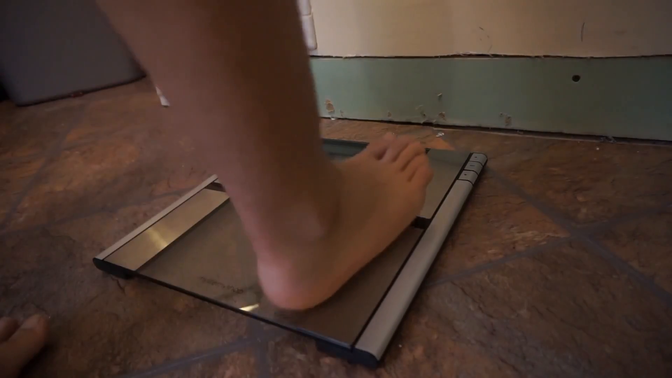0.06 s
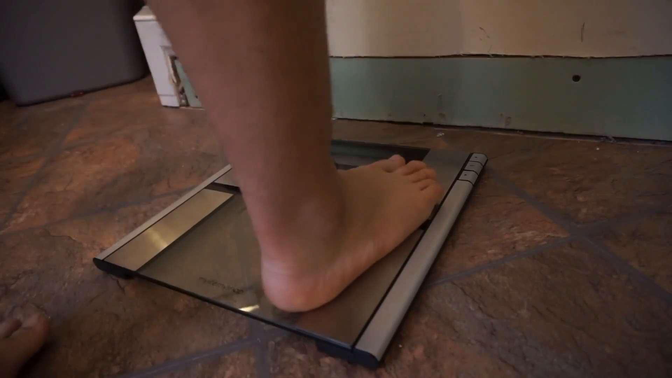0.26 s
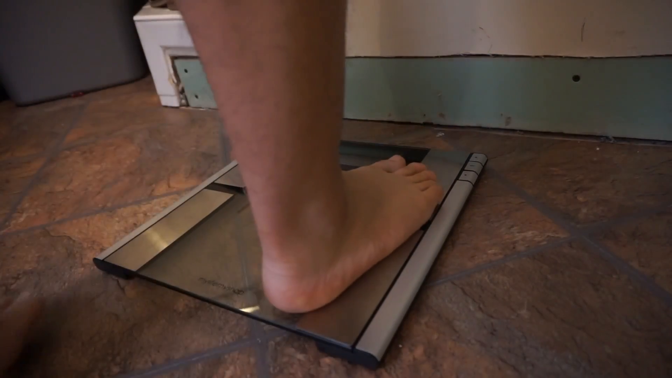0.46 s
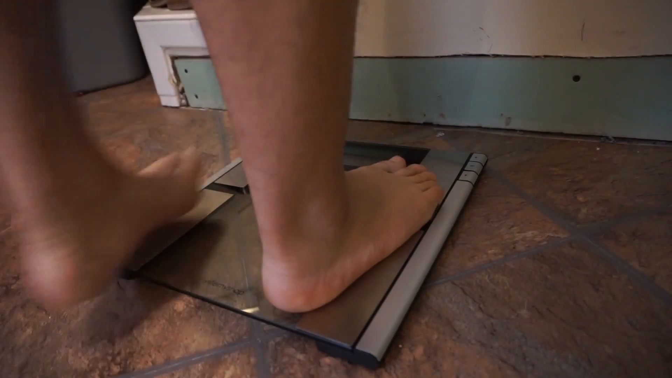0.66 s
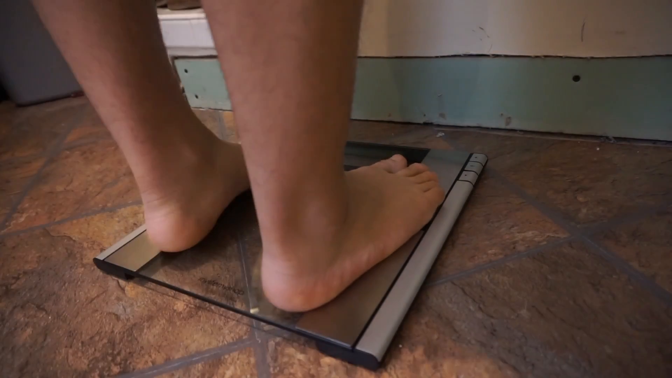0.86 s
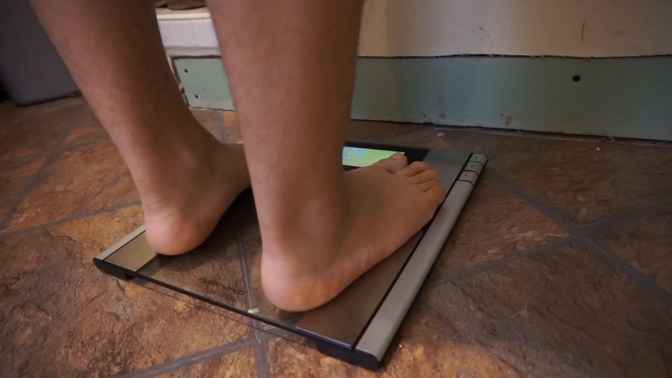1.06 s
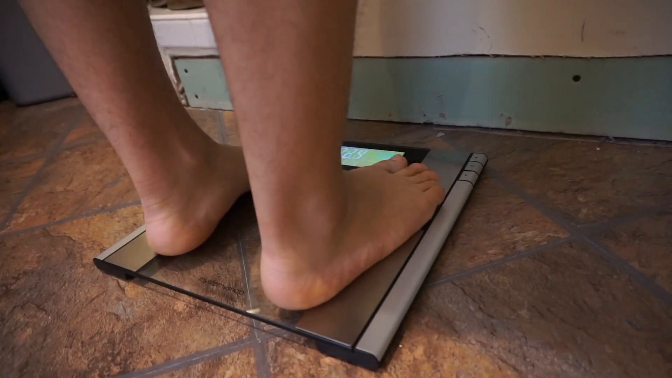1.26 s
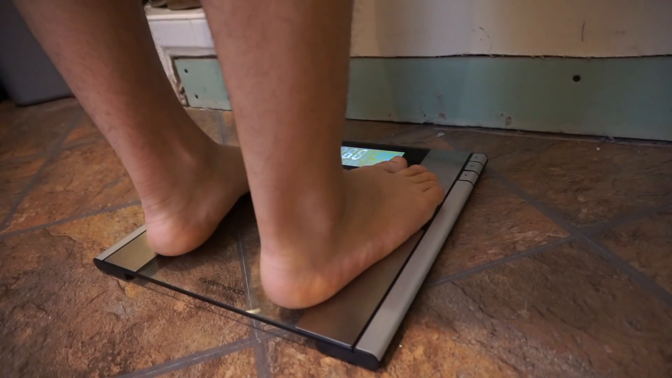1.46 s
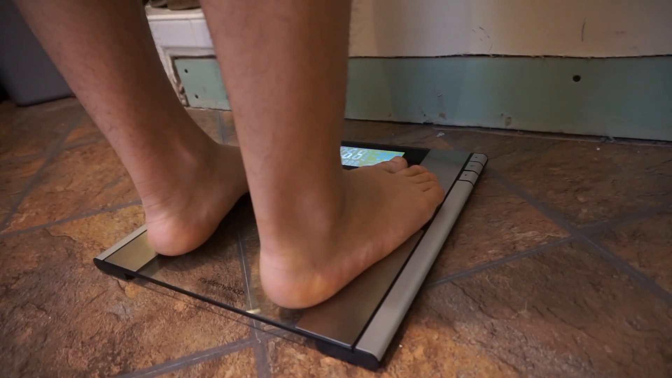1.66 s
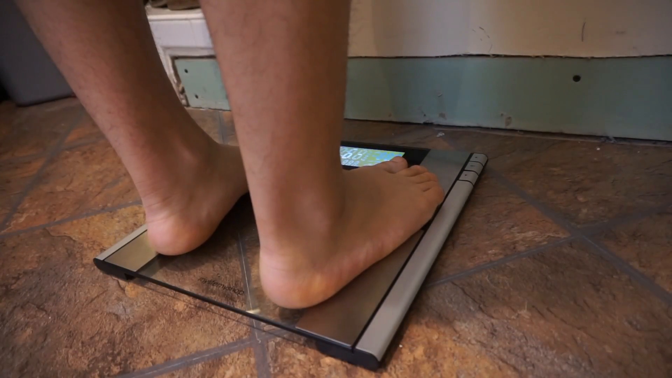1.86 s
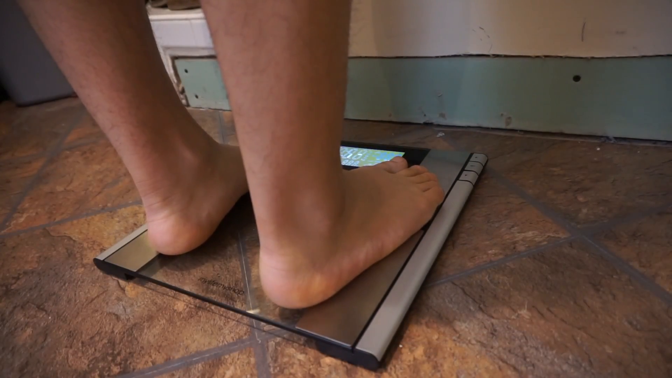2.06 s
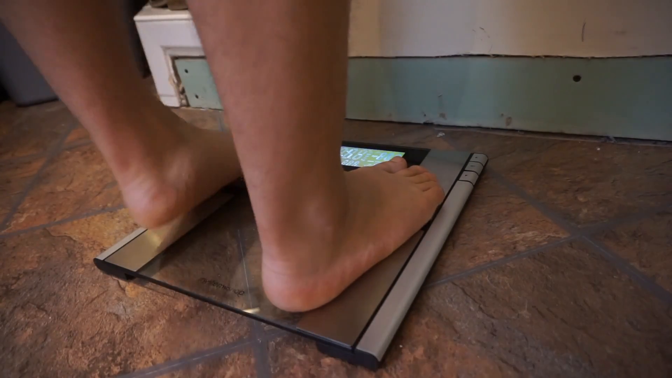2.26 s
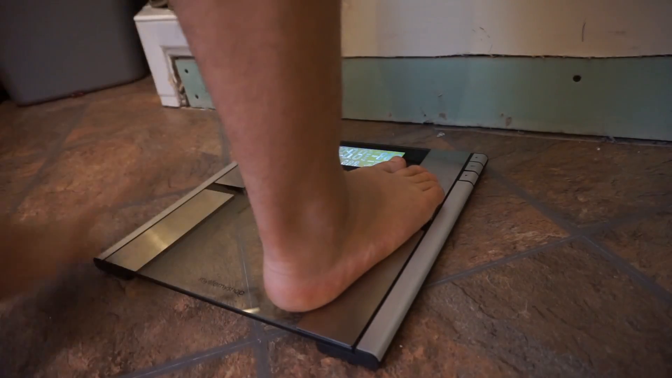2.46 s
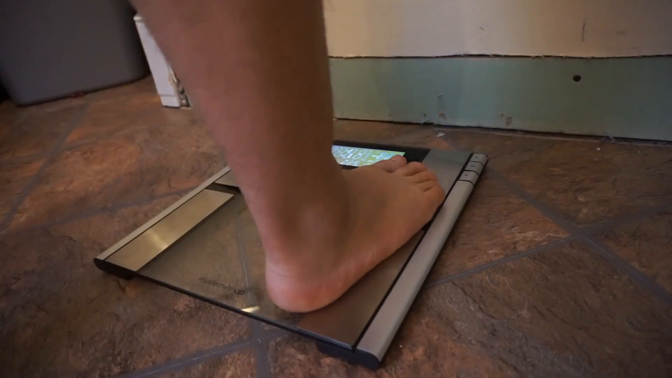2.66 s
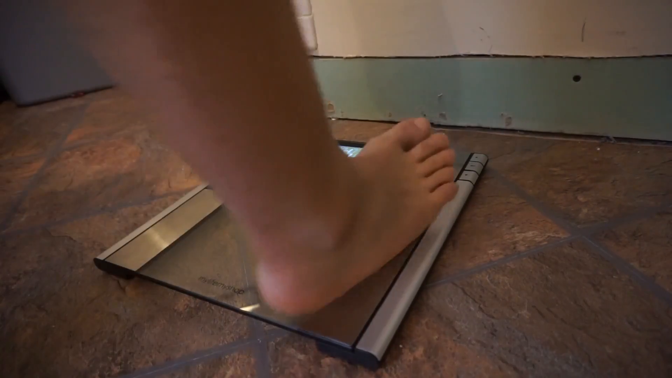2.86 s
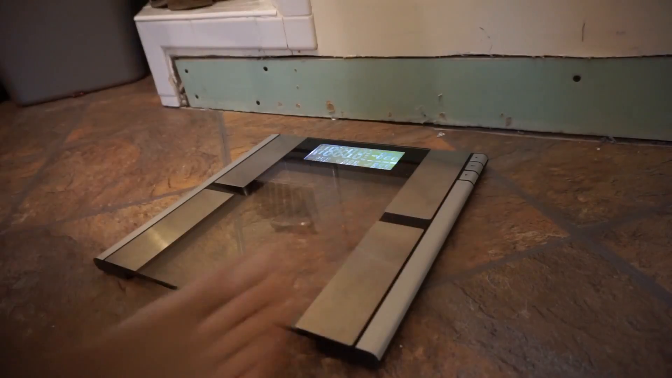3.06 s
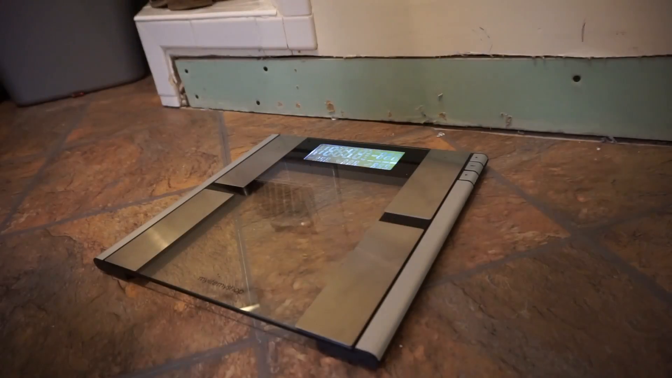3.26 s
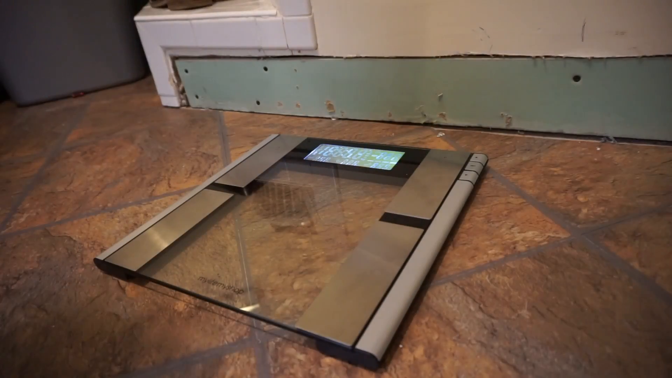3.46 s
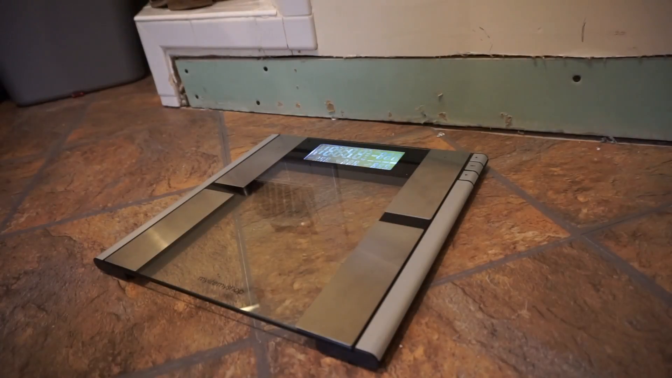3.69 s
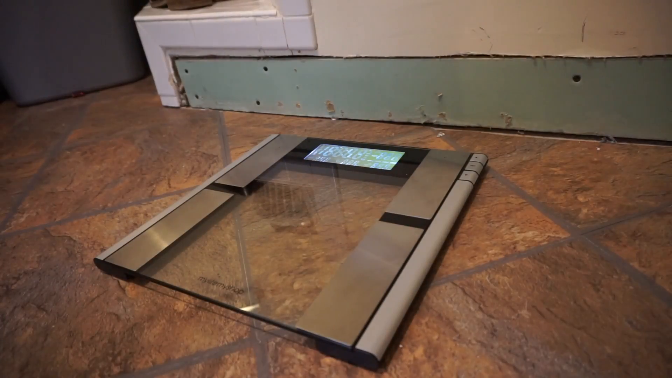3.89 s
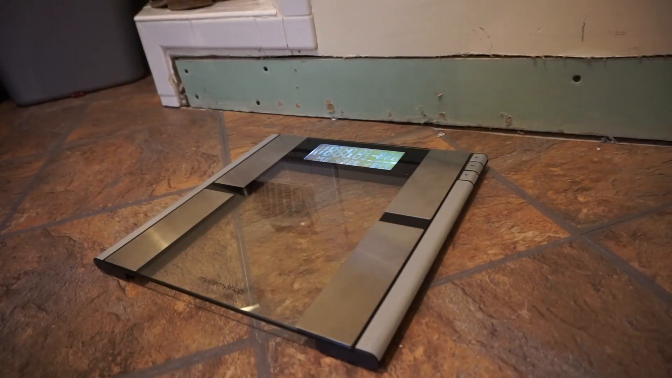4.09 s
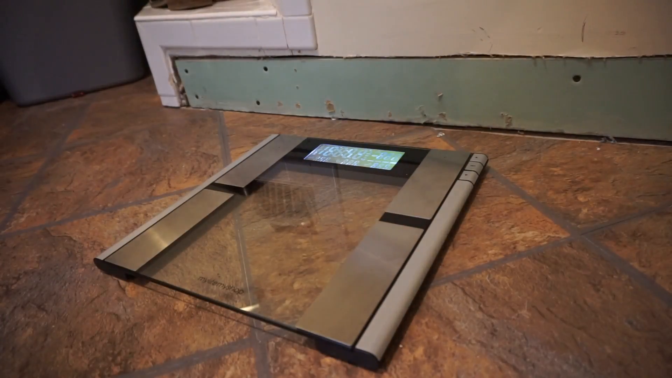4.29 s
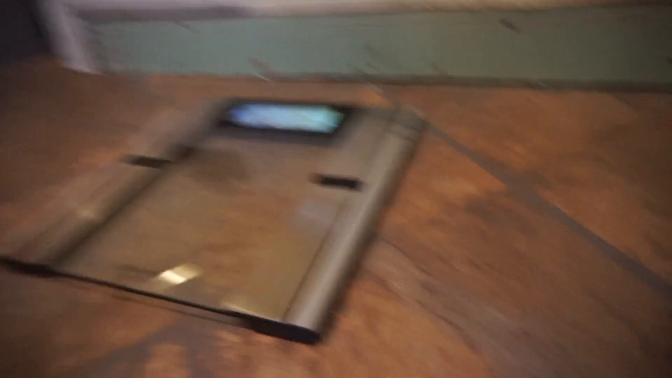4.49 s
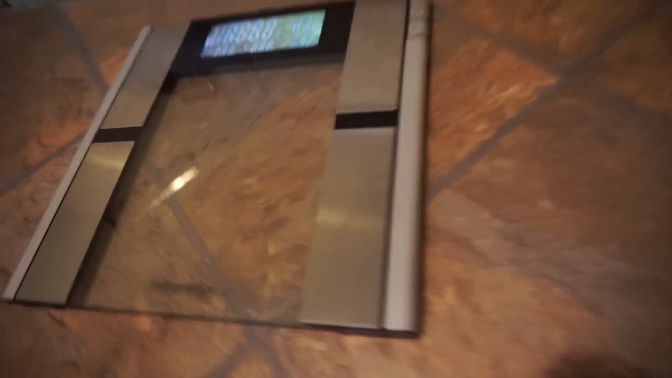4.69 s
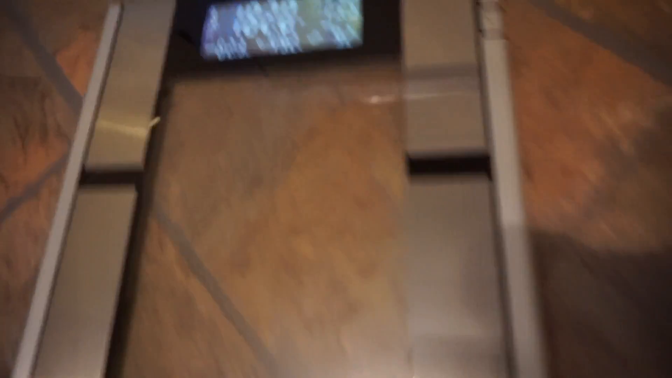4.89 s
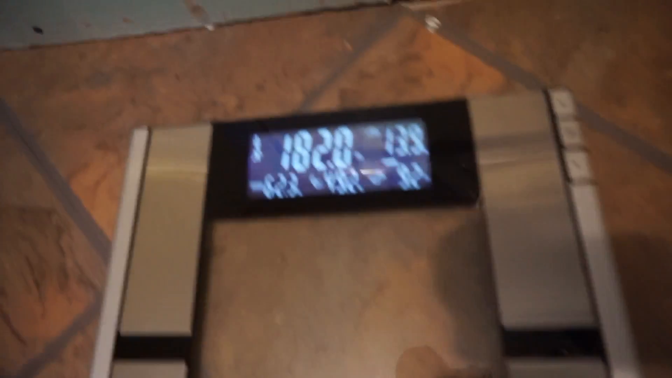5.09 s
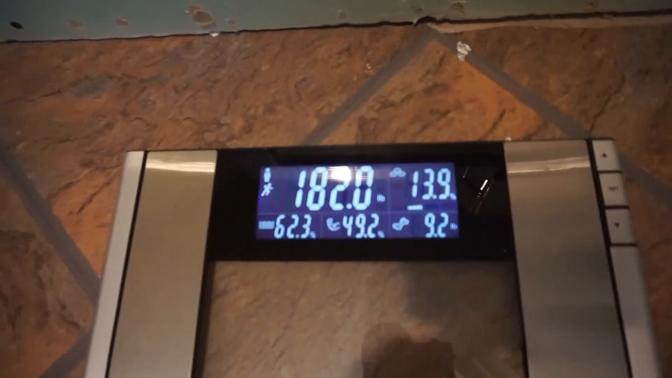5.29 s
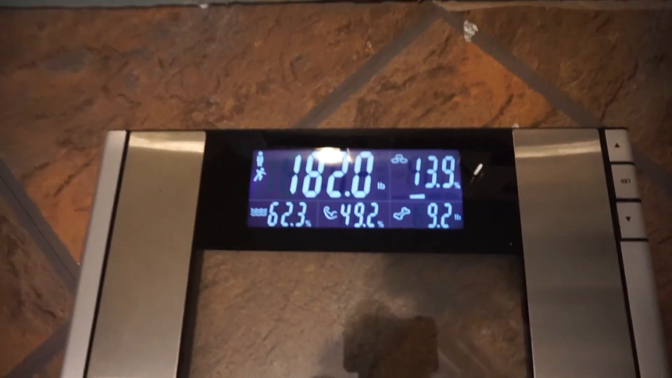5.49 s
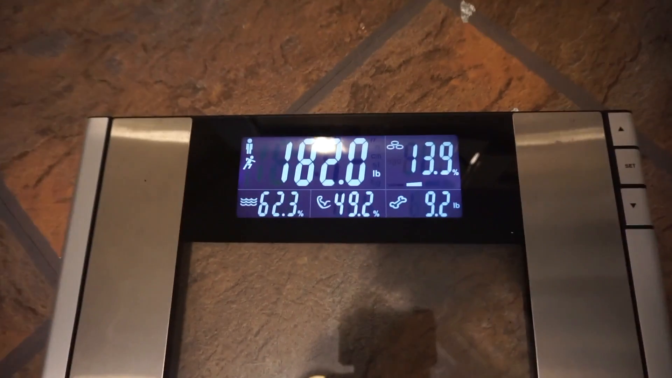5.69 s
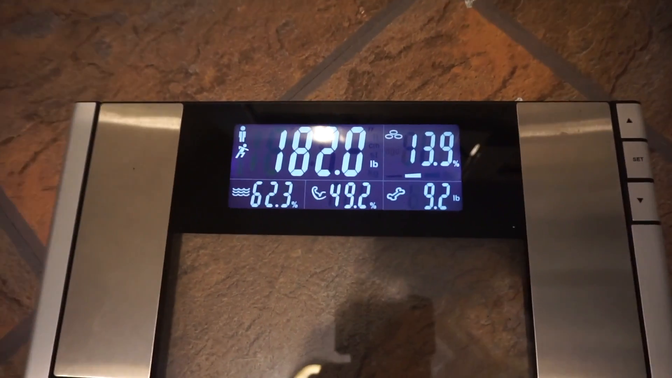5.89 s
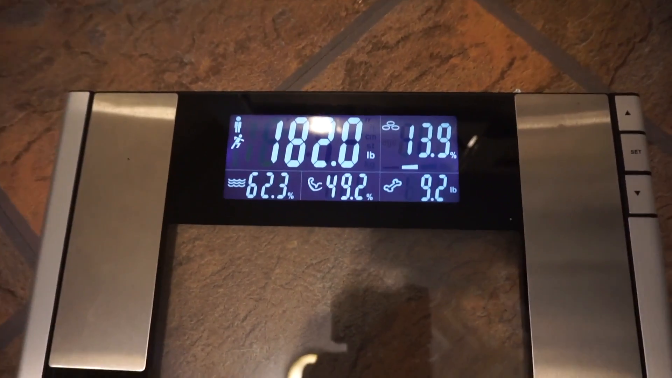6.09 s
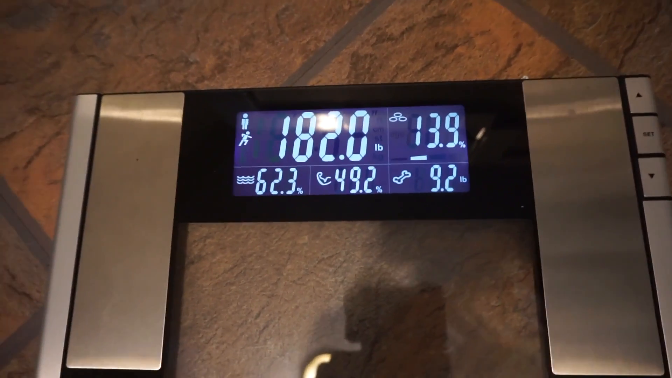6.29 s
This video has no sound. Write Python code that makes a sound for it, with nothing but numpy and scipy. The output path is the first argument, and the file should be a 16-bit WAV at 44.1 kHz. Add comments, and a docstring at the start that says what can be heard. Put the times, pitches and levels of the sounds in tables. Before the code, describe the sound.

Bare feet softly pat, rub and click on a glass bathroom scale, then a camera is picked up from tile with a louder clatter.

```python
"""Light clicks and skin rubs: bare feet step onto a glass bathroom scale on tile, stand, and step off.
The scale's frame or a joint clicks and rings; soles pat, slide and peel from the glass.
A camera is then picked up from the floor: its body clatters and scrapes right at the microphones,
and fingers tap it. A small hard room answers, over a steady quiet hiss."""
import sys
import numpy as np
from scipy import signal
from scipy.fft import rfft, irfft, next_fast_len
from scipy.io import wavfile
from scipy.ndimage import uniform_filter1d

SR = 44100
rng = np.random.default_rng(int(sys.argv[2]) if len(sys.argv) > 2 else 0)


def to_wav(sig):
    """Store sig (one row per channel, or 1-D mono) as 16-bit WAV at the path in sys.argv[1].

    Samples outside -1..1 are clipped; the rate is SR.
    """
    pcm = np.clip(np.atleast_2d(sig), -1, 1) * 32767
    pcm = np.round(pcm).astype(np.int16)
    wavfile.write(sys.argv[1], SR, pcm.T)  # frames by channels


N = 279653
TIME_S = np.arange(N) / SR

# skin sliding on or peeling from glass and tile: (peak time [s], rise [s], fall [s], level [dB])
SOLE_RUBS = [(.33, 0.023, 0.037, -49), (.565, 0.047, 0.05, -47), (.955, .043, 0.027, -52.5),
             (2.325, 0.018, 0.044, -45.5), (2.395, 0.025, 0.02, -44), (2.71, 0.013, .06, -53),
             (2.915, 0.079, 0.029, -41), (3.51, .044, 0.15, -58.5), (3.8, 0.13, 0.16, -52.5),
             (3.96, 0.028, 0.079, -58)]
# flat sole landing: (peak time [s], level [dB], pitch of the hollow under it [Hz])
SOLE_PATS = [(.212, -44, 1210), (.275, -52.5, 487), (.965, -55, 625), (2.41, -50.5, 510),
             (2.817, -44, 1450), (2.92, -50, 1050), (3.7, -59, 490)]
# spectra of skin fizz, dull sole, floor load, skin snaps: (frequency [Hz], relative level [dB])
SKIN_SPECTRUM = [(300, -24), (700, -10), (1050, -3.5), (1500, -7), (2200, 3), (3050, 4), (4000, 0),
                 (8000, -2.5), (13000, 0), (16000, -5.5)]
SOLE_SPECTRUM = [(100, -28), (300, -19.5), (480, 0.5), (750, -2), (1050, 5), (1700, 0), (2600, -2.5),
                 (6000, -20)]
LOAD_SPECTRUM = [(20, 3), (45, -2), (90, -7), (160, -3), (400, -18), (1000, -50)]
CRACKLE_SPECTRUM = [(200, -32), (900, -5), (3000, 0), (6000, -3), (15000, -14)]
# clicks of the scale's frame, a joint or the camera's strap:
# (time [s], relative level [dB], hardness [dB/oct], ring [Hz], ring boost [dB], relative send [dB])
SHARP_CLICKS = [(0.184, -50.5, 0.1, 4400, 6.5, -2), (0.393, -41.5, -1, 3145, 11.5, -8.5),
                (0.407, -55, 2.5, 3180, 2, 0.5), (0.5401, -53.5, 1.5, 2970, 2.5, 1),
                (0.9195, -54, -6, 3180, 10.5, -2.5), (0.9414, -52, 0.9, 3460, 5.5, -5.5),
                (1.2257, -63.5, 1.5, 4000, 2.5, 0.5), (2.37, -33.5, -2, 2800, 2.5, -14),
                (2.925, -43, 1, 3020, -4.5, -4.5), (3.1815, -60.5, 2.5, 4000, -13, -2),
                (4.9881, -42.5, -2.5, 3250, 6, -7)]
# resonances of scale and camera: (frequency [Hz], width [Hz], gain [dB])
SCALE_RESONANCES = [(508, 83, 6.5), (683, 100, 0), (1050, 170, 4), (1320, 180, -3), (1930, 360, -14),
                    (2800, 550, -2), (8800, 420, -12), (11650, 4400, -19)]
CAMERA_RESONANCES = [(357, 14, -6), (437, 72, -11), (582, 62, -1.5), (705, 39, -0.5), (800, 64, -2),
                     (998, 65, 1.5), (1230, 190, 11.5), (1390, 56, 12.5), (1763, 170, 4.5), (2000, 100, 0),
                     (2870, 460, 14.5), (3440, 280, -7), (5840, 560, -1), (7350, 1700, -2),
                     (9900, 670, -11)]
# clack, thud, ring and snap bands of an impact: (low [Hz], high [Hz], L-R likeness [0-1])
IMPACT_BANDS = [(774, 1890, 0.66), (251, 727, 0.83), (2120, 4930, 0), (5400, 14400, 0.04)]
# band balance at hardness 0: (clack [dB], thud [dB], ring [dB], snap [dB])
CLICK_BANDS_DB = [1, -17.5, 3, 0]
KNOCK_BANDS_DB = [0, -9, 0.5, -5]
TAP_BANDS_DB = [1.5, -23, -12, -14]
# camera on tile and in the hand:
# (time [s], relative level [dB], hardness [dB/oct], pan L-R [dB], rattle [s])
CAMERA_KNOCKS = [(4.4121, -38, 0.5, -4, .002), (4.4209, -41, -3, -5, 0.0075), (4.4307, -20, -3, -3, .016),
                 (4.4412, -20.5, -4, -1, 0.0235), (4.4477, -30, 2, 3, .002), (4.4636, -29, -6, -6, .002),
                 (4.4683, -35, 4, -5, .002), (4.497, -28, -5, 4, .002), (4.5037, -34, -7, -8, .002),
                 (4.5135, -32, 1, 4, .012), (4.521, -31.5, 4, -3, .002), (4.5354, -35.5, 0, 6, .002),
                 (4.5384, -21, -5.5, -3.5, .006), (4.553, -24.5, -2.5, -1, .005),
                 (4.5806, -22.5, -6.5, -2, .014), (4.594, -24.5, -7, -4, .003), (4.6213, -44.5, 1, 0, .002),
                 (4.7397, -43, -9, -5, .003), (4.8045, -48, -5, 3, .002), (4.871, -54, 1, -2, .002),
                 (4.9161, -28.5, -7, -0.5, .002), (4.9244, -34.5, -7.5, -1, .002)]
# fingertips on the raised camera: (time [s], relative level [dB])
FINGER_TAPS = [(5.2358, -52.5), (5.572, -52.5), (5.5928, -54.5), (6.0632, -50)]
# grip shifts: (peak time [s], rise [s], fall [s], fizz level [dB], dull body re fizz [dB])
GRIP_SHIFTS = [(4.455, 0.026, 0.0064, -33.5, -3.5), (4.565, 0.046, 0.094, -39.5, -5.5),
               (4.72, 0.32, 0.47, -56, -6), (6.3, 0.054, 0.072, -78, 16)]
# spectra of shell fizz and dull hand: (frequency [Hz], relative level [dB])
SHELL_SPECTRUM = [(300, -12), (1300, 2), (3000, 3.5), (5000, -4), (8000, -5), (11000, -14.5), (16000, -22)]
HAND_SPECTRUM = [(60, -7), (130, 6), (260, 12), (500, 10), (1300, 10.5), (2500, -1), (6000, -33)]
# faint ring as the camera is raised: (start frequency [Hz], width [Hz], level [dB])
FUZZY_BANDS = [(700, 96, -52.5), (1800, 370, -54), (2950, 450, -60), (4400, 450, -56)]
# swaying on the scale, handling the camera: (peak time [s], fall [s], level [dB])
SOFT_THUMPS = [(1.34, 0.05, -76), (1.45, .05, -74), (4.448, .025, -60), (4.59, .04, -53), (4.7, .17, -66),
               (6.3, 0.091, -68)]
# spectra of thumps, hiss and room tail: (frequency [Hz], relative level [dB])
THUMP_SPECTRUM = [(20, -19), (45, -19), (85, -12), (135, 3.5), (190, -8), (260, 4), (400, -17), (1000, -56)]
HISS_SPECTRUM = [(24, -61), (40, -37), (209, -20.5), (363, -11), (455, -11), (630, -6), (770, -7),
                 (1180, -3), (1270, -3), (1440, -4.5), (2150, -7.5), (2770, -7.5), (4340, -8),
                 (13100, -11.5), (16000, -16)]
ROOM_SPECTRUM = [(150, -7), (300, 11), (550, -0.5), (850, -0.5), (1300, -1), (2000, 0), (3200, 3),
                 (4400, -7), (7000, -3), (15000, -9)]
# broad humps in the hiss: (frequency [Hz], width [Hz], gain [dB])
HISS_HUMPS = [(1284, 770, 3), (2920, 970, 2.5), (13000, 430, 0.5)]
# stereo image of the hiss: (frequency [Hz], L-R likeness [0-1])
HISS_STEREO = [(60, .5), (300, 0.24), (700, 0), (15000, 0.13)]
# room decay: (frequency [Hz], T60 [s])
ROOM_DECAY = [(150, 1), (500, 0.89), (1500, 1), (3200, 0.38), (7000, 1), (15000, 0.29)]


def feet(trail_s=0.33, trail_db=-18, firm_db=-44.5, load_db=-40.5):
    """Soles rub and trail off, fuller the firmer they press; shifting weight pushes on the floor."""
    rub = sum(swell(s, rise_s, fall_s, db) + swell(s, rise_s, trail_s, db + trail_db)
              for s, rise_s, fall_s, db in SOLE_RUBS)
    body = amp(-8) * rub * (rub / amp(firm_db)) ** 0.65
    load = sum(swell(s, rise_s=0.05, fall_s=0.07, db=db + load_db) for s, _, _, db in SOLE_RUBS)
    skin = friction(rub, body, SKIN_SPECTRUM, SOLE_SPECTRUM, grain_db=2, likeness=0.65)
    return skin + sole_pats() + load * coloured(white(), LOAD_SPECTRUM, likeness=0.6)


def sole_pats(hollow_q=2.8, hollow_db=11.5):
    """A landing sole squeezes out air, which sounds the hollow under it."""
    air = coloured(white(), SOLE_SPECTRUM, likeness=0.84)
    out = np.zeros((2, N))
    for s, db, hz in SOLE_PATS:
        hollow = resonate(air, [(hz, hz / hollow_q, hollow_db)], direct=1)
        out += swell(s, rise_s=0.017, fall_s=0.029, db=db) * unit_rms(hollow)
    return out


def skin_crackle(snaps_per_s=300, spread_db=3.5, re_rub_db=-11.5):
    """Sticky skin snaps free and ticks the glass during each rub."""
    sizes = amp(spread_db * np.minimum(rng.exponential(1, N), 3))
    sizes *= rng.random(N) < snaps_per_s / SR
    snaps = resonate(sizes * white(), SCALE_RESONANCES, direct=0.88)
    rub = sum(swell(*row) for row in SOLE_RUBS)
    return amp(re_rub_db) * rub * coloured(snaps, CRACKLE_SPECTRUM, likeness=0.3)


def sharp_clicks(ring_width_hz=580):
    """Sharp clicks from the scale's frame, a joint or the camera's strap, each with its own ring."""
    near, send = np.zeros((2, 2, N))
    for s, db, hardness, ring_hz, boost_db, send_db in SHARP_CLICKS:
        levels_db = band_levels_db(db, hardness, CLICK_BANDS_DB)
        levels_db[2] += boost_db  # ring band
        modes = SCALE_RESONANCES + [(ring_hz, ring_width_hz, 6 + boost_db)]
        click = impact(levels_db, modes, t60_s=0.019, pan_db=-2, chatter=0.44, direct=0.48)
        add(near, s, click)
        add(send, s, amp(send_db) * click)
    return near, send


def click_rings(t60_s=0.23, width_hz=640):
    """Close resonances beat and die away after each click."""
    t, out = np.arange(SR // 3) / SR, np.zeros((2, N))
    for s, db, _, hz, boost_db, _ in SHARP_CLICKS:
        start_db = db - 19.5 + 1.96 * boost_db
        add(out, s, amp(start_db - 60 * t / t60_s) * noise_band(hz * t, width_hz, order=3))
    return out


def camera_clatter(rebound_s=0.0039, fade_db=14, soften_db_per_oct=1.9):
    """The camera rocks on the tile, its rebounds ever weaker and softer; then fingers tap it."""
    out = np.zeros((2, N))
    for s, db, hardness, pan_db, rattle_s in CAMERA_KNOCKS:
        for delay_s in np.arange(0, rattle_s, rebound_s):
            spent = delay_s / rattle_s
            softened = hardness - soften_db_per_oct * spent
            levels_db = band_levels_db(db - fade_db * spent, softened, KNOCK_BANDS_DB)
            knock = impact(levels_db, CAMERA_RESONANCES, t60_s=0.013, pan_db=pan_db,
                           chatter=0.45, direct=0.82)
            add(out, s + delay_s, knock)
    for s, db in FINGER_TAPS:
        levels_db = db + np.array(TAP_BANDS_DB)
        tap = impact(levels_db, CAMERA_RESONANCES, t60_s=0.016, pan_db=0, chatter=0.3, direct=0.64)
        add(out, s, tap)
    return out


def hand_rubs():
    """The hand rubs the camera's shell as its grip shifts."""
    fizz = sum(swell(s, rise_s, fall_s, db) for s, rise_s, fall_s, db, _ in GRIP_SHIFTS)
    body = sum(swell(s, rise_s, fall_s, db + body_db) for s, rise_s, fall_s, db, body_db in GRIP_SHIFTS)
    return friction(fizz, body, SHELL_SPECTRUM, HAND_SPECTRUM, grain_db=3, likeness=0.86)


def fuzzy_ring(start_s=4.992, rise_s=0.012, hold_s=0.11, sag_per_s=0.92):
    """Narrow noise bands linger after the last click and sink a little in pitch."""
    t, out = np.arange(SR // 4) / SR, np.zeros((2, N))
    envelope = (1 - np.exp(-t / rise_s)) * np.exp(-(t / hold_s) ** 3)
    for hz, width_hz, db in FUZZY_BANDS:
        cycles = np.cumsum(hz * np.exp(-sag_per_s * t)) / SR
        add(out, start_s, amp(db) * envelope * noise_band(cycles, width_hz, order=2))
    return out


def thumps():
    """Swaying and handling give soft, low thumps."""
    push = sum(swell(s, 0.42 * fall_s, fall_s, db) for s, fall_s, db in SOFT_THUMPS)
    return push * coloured(white(), THUMP_SPECTRUM, likeness=0.99)


def room(x, gap_s=0.008, early_db=2.5, early_t60_s=0.18, echoes_per_s=4000):
    """Small tiled room: strong early reflections, then a tail whose top treble dies first."""
    t = np.arange(SR * 3 // 4) / SR
    echoes = white(len(t)) * (rng.random((2, len(t))) < echoes_per_s / SR) * (t > gap_s)
    echoes *= 1 + amp(early_db - 60 * t / early_t60_s)
    hz, age_s, bins = signal.stft(echoes, SR, nperseg=256)
    bins *= amp(curve_at(ROOM_SPECTRUM, hz)[:, None] - 60 * age_s / curve_at(ROOM_DECAY, hz)[:, None])
    tail = signal.istft(bins, SR, nperseg=256)[1]
    return signal.fftconvolve(x, unit_rms(tail) / np.sqrt(tail.shape[1]), axes=1)[:, :N]


def hiss(level_db=-54.5):
    """Steady room air and microphone hiss."""
    hz = np.fft.rfftfreq(N, 1 / SR)
    humps_db = sum(db * np.exp(-(2 * (hz - centre_hz) / width_hz) ** 2)
                   for centre_hz, width_hz, db in HISS_HUMPS)
    bins = correlate(rfft(white()), curve_at(HISS_STEREO, hz))
    bins *= amp(curve_at(HISS_SPECTRUM, hz) + humps_db)
    return amp(level_db) * unit_rms(irfft(bins, N))


def friction(fizz_gain, body_gain, fizz_spectrum, body_spectrum, grain_db, likeness):
    """Skin lets go in countless tiny slips: a grainy fizz over a duller body."""
    slips = white() * amp(grain_db * unit_rms(uniform_filter1d(rng.standard_normal(N), 40)))
    fizz = coloured(slips, fizz_spectrum, likeness=0.059)
    body = coloured(white(), body_spectrum, likeness)
    return fizz_gain * fizz + body_gain * body


def impact(levels_db, modes, t60_s, pan_db, chatter, direct):
    """A sharp contact and its dying chatter ring a body, band by band."""
    t = np.arange(4096) / SR
    noise, out = white(len(t)), np.zeros((2, len(t)))
    for (low_hz, high_hz, likeness), db in zip(IMPACT_BANDS, levels_db):
        force = (t == 0) + chatter * correlate(noise, likeness) * amp(-60 * t / t60_s)
        band = signal.butter(3, [low_hz, high_hz], "band", fs=SR, output="sos")
        out += amp(db) * unit_rms(signal.sosfilt(band, resonate(force, modes, direct)))
    burst_gain = np.sqrt(0.006 / t[-1])  # levels refer to a 6 ms burst
    return burst_gain * out * amp([[pan_db / 2], [-pan_db / 2]])


def band_levels_db(db, hardness, balance_db, bend_per_oct=0.12):
    """Harder contact tilts the bands about the clack, more steeply towards the treble."""
    centres_oct = np.array([np.log2(low_hz * high_hz) / 2 for low_hz, high_hz, _ in IMPACT_BANDS])
    octaves = centres_oct - centres_oct[0]
    return db + np.array(balance_db) + hardness * octaves * (1 + bend_per_oct * octaves)


def resonate(force, modes, direct):
    """A force drives a body's resonances; a share radiates directly."""
    return direct * force + sum(amp(db) * signal.lfilter(*signal.iirpeak(hz, hz / width_hz, SR), force)
                                for hz, width_hz, db in modes)


def swell(peak_s, rise_s, fall_s, db):
    """Gain of one stroke: bell-shaped rise, exponential fall."""
    drop = np.where(TIME_S < peak_s, ((peak_s - TIME_S) / rise_s) ** 2, (TIME_S - peak_s) / fall_s)
    return amp(db) * np.exp(-np.minimum(drop, 20))


def noise_band(cycles, width_hz, order):
    """Narrow noise around a carrier whose phase is given in cycles; rms 1."""
    noise = white(len(cycles)) + 1j * white(len(cycles))
    flutter = signal.sosfilt(signal.butter(order, width_hz / 2, fs=SR, output="sos"), noise)
    return unit_rms((flutter * np.exp(2j * np.pi * cycles)).real)


def coloured(noise, spectrum, likeness):
    """Gives stereo noise a spectrum and an L-R likeness; rms 1."""
    size = next_fast_len(N)
    gain = amp(curve_at(spectrum, np.fft.rfftfreq(size, 1 / SR)))
    return unit_rms(irfft(correlate(rfft(noise, size), likeness) * gain, size)[:, :N])


def correlate(x, likeness):
    """Blends two unrelated channels to the given likeness."""
    return np.array([x[0], likeness * x[0] + np.sqrt(1 - likeness ** 2) * x[1]])


def curve_at(points, hz):
    """Interpolates on a log-frequency axis."""
    points_hz, values = np.transpose(points)
    return np.interp(np.log(hz + 1), np.log(points_hz + 1), values)


def add(mix, start_s, sound):
    part = mix[:, round(start_s * SR):][:, :sound.shape[1]]
    part += sound[:, :part.shape[1]]


def white(samples=N):
    return rng.standard_normal((2, samples))


def unit_rms(x):
    return x / np.sqrt(np.mean(x ** 2, axis=-1, keepdims=True) + 1e-30)


def amp(db):
    return 10 ** (np.asarray(db) / 20)


def scene():
    """Clicks sound into the room; camera knocks reach the microphones mostly through the shell."""
    clicks, click_send = sharp_clicks()
    camera = camera_clatter()
    reverb = room(amp(2) * click_send + amp(-23.5) * camera)
    impacts = amp(1.85) * clicks + amp(-0.74) * camera + reverb
    return impacts + fuzzy_ring() + feet() + hand_rubs() + thumps() + hiss() + click_rings() + skin_crackle()


def record(dry):
    """Low-pass at 16.1 kHz."""
    lowpass = signal.firwin(511, 16100, window=("kaiser", 9), fs=SR)
    return signal.oaconvolve(dry, lowpass[None], "same")


dry = scene()
out = record(dry)
to_wav(out)
```